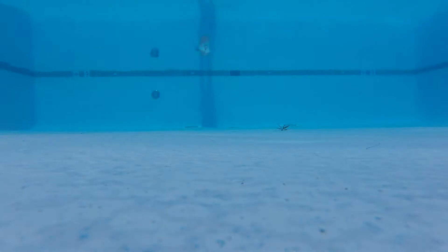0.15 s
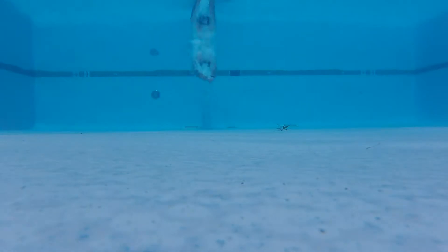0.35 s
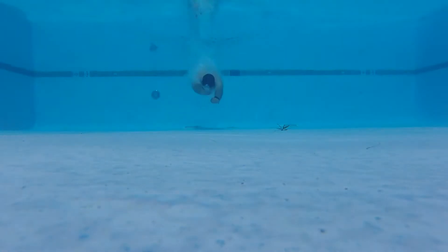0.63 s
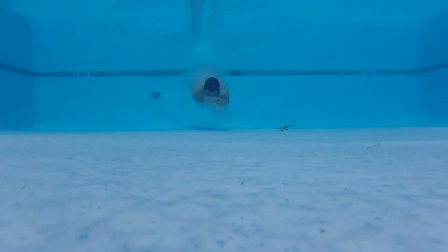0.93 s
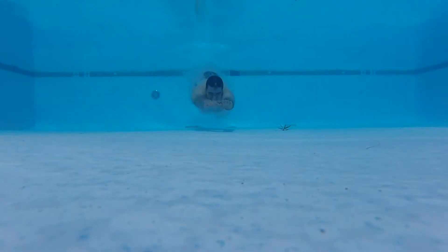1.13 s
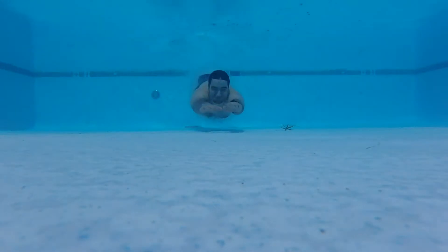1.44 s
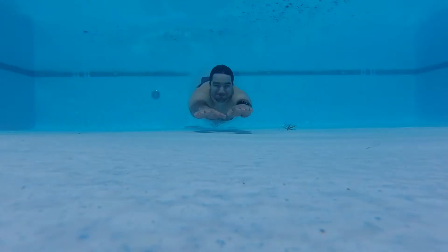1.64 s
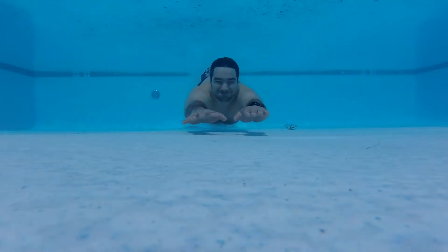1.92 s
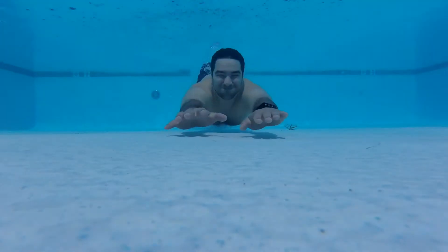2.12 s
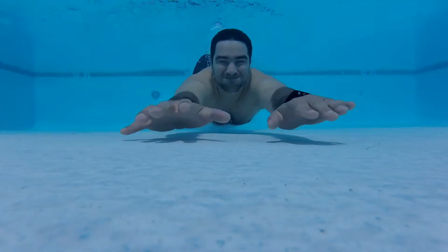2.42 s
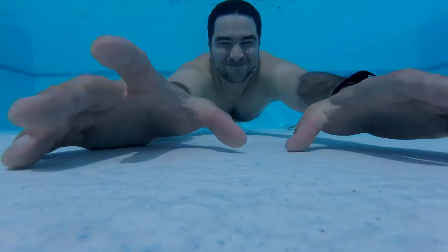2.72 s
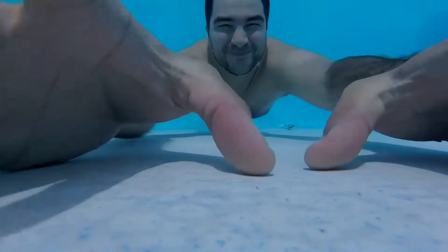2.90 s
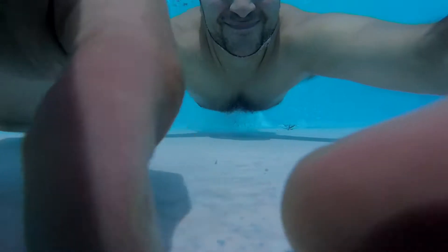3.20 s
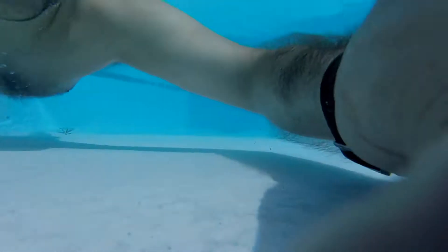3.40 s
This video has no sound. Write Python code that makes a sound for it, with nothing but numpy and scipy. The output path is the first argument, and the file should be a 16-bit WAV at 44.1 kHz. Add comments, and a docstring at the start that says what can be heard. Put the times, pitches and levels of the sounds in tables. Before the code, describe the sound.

Muffled, boxy underwater sound inside a sealed case. Nearly quiet until 0.2 s, when a plunge erupts in dense mid-pitched gurgling, hard bubble plops and deep throbs near 0.35 and 0.75 s, with dry ticks dipping the background. Softer gurgle continues to 1.8 s; plops and low glugs then gather, thickest at 2.8-3.0 s. Wash surges around 3.3 s; hands thud at 3.2 and 3.37 s, scuff, and finally knock at 3.54 s.

```python
"""In a pool, a swimmer dives in and glides up to a sealed case on the bottom; all is heard inside the case.
The plunge tears in air: big pockets throb as decaying sines, clouds of random clicks gurgle through the
case's boxy resonance. Single bubbles plop, chirp and glug as short swelling tones. Shaped noise and clicks
rumble and wash. Hands bump, scuff and knock the case; at some dry ticks the background level drops
abruptly and creeps back."""
import sys
import numpy as np
from scipy import signal
from scipy.fft import rfft, irfft
from scipy.io import wavfile
from scipy.ndimage import uniform_filter1d, minimum_filter1d

SR = 44100
rng = np.random.default_rng(int(sys.argv[2]) if len(sys.argv) > 2 else 0)


def transcribe(signal):
    """Save signal, clipped to [-1, 1], as a 16-bit WAV file at the path in sys.argv[1]."""
    frames = np.atleast_2d(signal).T
    limited = np.clip(frames, -1, 1)
    pcm = np.round(limited * 32767).astype(np.int16)
    wavfile.write(sys.argv[1], SR, pcm)


N = 156555
TIME = np.arange(N) / SR

# boxy resonance of the case: freq_hz, relative_db
CASE_COLOUR = [(200, -48), (310, -39.5), (375, -31), (455, -9), (520, -5.5), (565, -5.5), (650, 2),
               (715, -2), (785, -5.5), (845, -13.5), (915, -8.5), (990, -14), (1100, -28), (1175, -26),
               (1300, -38.5), (3000, -69.5), (6000, -87.5)]
# spectrum of the finest bubbles: freq_hz, relative_db
FIZZ_COLOUR = [(600, -19.5), (1100, 2), (1400, 2.5), (2000, 3.5), (2600, -10), (3500, -21.5), (5000, -33),
               (9000, -45)]
# dry ticks, some with a sudden drop of the background: start_s, peak_db, background_drop_db (nominal)
TICKS = [(.3006, -23, 5.5), (.7167, -22.5, 10.5), (.7486, -46, 0), (.7785, -51, 0), (.9086, -44, 0),
         (3.021, -48, 2), (3.085, -50, 0), (3.1487, -25, 10), (3.3087, -38.5, 0), (3.3406, -43, 0),
         (3.3727, -32.5, 0), (3.3808, -41, 5), (3.5006, -41, 4)]


def from_db(db):
    """Decibels to gain."""
    return 10 ** (np.asarray(db) / 20)


def rms_one(x):
    """Scale to rms 1."""
    return x / np.sqrt(np.mean(x ** 2) + 1e-20)


def level(rows):
    """Gain over time from (time_s, level_db) points."""
    return from_db(np.interp(TIME, *np.transpose(rows)))


def since(start_s):
    """Seconds since an event, zero before it."""
    return np.maximum(TIME - start_s, 0)


def coloured(x, colour):
    """Minimum-phase filter through (freq_hz, db) points, by folding the cepstrum."""
    size = 16384
    freq_hz, db = np.transpose(colour)
    grid_hz = np.maximum(np.fft.rfftfreq(size, 1 / SR), 1)
    magnitude = from_db(np.interp(np.log(grid_hz), np.log(freq_hz), db))
    cepstrum = irfft(np.log(magnitude))
    cepstrum[1:size // 2] *= 2
    cepstrum[size // 2 + 1:] = 0
    impulse_response = irfft(np.exp(rfft(cepstrum)))[:size // 2]
    return signal.fftconvolve(x, impulse_response)[:len(x)]


def steady(x, window_s):
    """Even out slow swings, keep the fine grain; rms 1."""
    window = max(int(window_s * SR), 2)
    power = np.abs(uniform_filter1d(x ** 2, window))
    return rms_one(x / np.sqrt(power + 1e-12))


def noise(colour):
    """Coloured noise with a 1 s run-in discarded; rms 1."""
    return rms_one(coloured(rng.standard_normal(N + SR), colour)[SR:])


def grains(per_s, spread_db):
    """Random clicks of random sign; sizes are exponential in dB, capped at 4 spreads."""
    sizes = from_db(spread_db * np.minimum(rng.exponential(1, N), 4))
    signs = rng.choice([-1, 1], N)
    return sizes * signs * (rng.random(N) < per_s / SR)


def bubble(start_s, peak_db, pitch_hz, swell_s, rise=0.0):
    """A tone that swells and dies; pitch climbs from below to above pitch_hz by up to the share `rise`."""
    age = np.minimum(since(start_s) / swell_s, 20)
    envelope = (age * np.exp(1 - age)) ** 2
    moving_hz = pitch_hz * (1 + rise * np.tanh(age / 2 - 1))
    phase = 2 * np.pi * np.cumsum(moving_hz * (age > 0)) / SR
    return from_db(peak_db) * envelope * np.sin(phase)


def rumble():
    """Water pushed by the swimmer rumbles: steadied low noise."""
    # time_s, level_db
    rumble_levels = [(0, -40), (.15, -49.5), (.32, -26), (.5, -21), (.62, -20.5), (.71, -24.5), (.8, -13),
                     (1.1, -27), (1.6, -35), (1.85, -30), (2.0, -26.5), (2.25, -22.5), (2.45, -40),
                     (2.65, -32), (2.85, -23), (3.1, -31), (3.3, -19), (3.55, -28.5)]
    # freq_hz, relative_db
    rumble_colour = [(10, -15), (24, 3.5), (45, 3), (68, 5.5), (100, -11.5), (170, -24.5), (400, -83.5)]
    return steady(noise(rumble_colour), window_s=0.21) * level(rumble_levels)


def hum():
    """A faint sine of wavering pitch, perhaps the pool's pump."""
    centre_hz, peak_db, wander_rms_share = 54, -43, .05
    slow_colour = [(1, 0), (6, 0), (30, -40), (200, -89.5)]
    wander = rms_one(coloured(rng.standard_normal(N), slow_colour))
    pitch_hz = centre_hz * (1 + wander_rms_share * wander)
    return from_db(peak_db) * np.sin(2 * np.pi * np.cumsum(pitch_hz) / SR)


def hiss():
    """A thin, constant coloured noise."""
    # freq_hz, relative_db
    hiss_colour = [(1000, 0), (3000, -2), (4500, -16.5), (5800, -9), (6200, -4), (6480, 7), (6900, 0),
                   (9000, -5.5), (10500, -13), (12500, -10.5), (14000, -25.5)]
    return from_db(-63.5) * noise(hiss_colour)


def wash():
    """Water breaks into lumpy eddies round the case: sparse low-passed grains."""
    # time_s, level_db
    wash_levels = [(0, -58), (.19, -62), (.3, -45), (.5, -49.5), (.72, -39), (.93, -37.5), (1.35, -35),
                   (1.72, -37.5), (1.96, -24.5), (2.2, -31.5), (2.47, -29), (2.83, -20.5), (3.1, -23.5),
                   (3.3, -9.5), (3.55, -31)]
    # freq_hz, relative_db
    wash_colour = [(40, -19), (85, 1), (130, -0.5), (190, -2), (245, -2.5), (300, -13.5), (345, -7.5),
                   (400, -12.5), (480, -15.5), (700, -30.5), (1500, -77)]
    eddies = coloured(grains(per_s=320, spread_db=2.5), wash_colour)
    return steady(eddies, window_s=0.36) * level(wash_levels)


def tinkle():
    """Small bubbles ring for many cycles, each size a resonator at its own pitch; rms 1."""
    pitches_hz = np.geomspace(1300, 3300, num=28)
    t60_cycles = 210
    clicks = grains(per_s=260, spread_db=3.5)
    dealt = rng.integers(0, len(pitches_hz), N)
    ringing = np.zeros(N)
    for k, hz in enumerate(pitches_hz):
        radius = from_db(-60 * hz / (t60_cycles * SR))
        angle = 2 * np.pi * hz / SR
        feedback = [1, -2 * radius * np.cos(angle), radius * radius]
        own_clicks = clicks * (dealt == k) + 1e-18  # offset avoids denormals
        ringing += signal.lfilter([0, np.sin(angle)], feedback, own_clicks)
    return steady(coloured(ringing, FIZZ_COLOUR), window_s=.25)


def bubble_cloud():
    """Countless small bursts ring the case; the finest add a fizz and a tinkle."""
    # time_s, level_db
    gurgle_levels = [(0, -58), (.15, -57), (.185, -44), (.22, -28), (.29, -20.5), (.4, -14.5), (.55, -15.5),
                     (.69, -15), (.76, -17.5), (.95, -21.5), (1.4, -20), (1.9, -19.5), (2.05, -19),
                     (2.13, -23), (2.4, -24.5), (2.68, -25), (2.9, -19), (2.98, -23.5), (3.06, -18.5),
                     (3.17, -20.5), (3.24, -10.5), (3.33, -16.5), (3.43, -26.5), (3.55, -30)]
    # time_s, level_db (fizz and tinkle together)
    fizz_levels = [(0, -65), (.18, -65.5), (.22, -54), (.27, -50.5), (.29, -38.5), (.315, -48), (.39, -44),
                   (.7, -49.5), (1.2, -54), (2.2, -54.5), (3.1, -60), (3.3, -50), (3.45, -60.5),
                   (3.55, -51)]
    gurgle = steady(coloured(grains(per_s=2000, spread_db=2.5), CASE_COLOUR), window_s=0.086)
    fizz = steady(coloured(grains(per_s=3000, spread_db=1), FIZZ_COLOUR), window_s=0.3)
    fine = from_db(-1.5) * fizz + from_db(-2.5) * tinkle()
    return gurgle * level(gurgle_levels) + fine * level(fizz_levels)


def plops():
    """Single bubbles burst, each with a faint crackle and a short wash of echoes from the pool."""
    # start_s, peak_db, pitch_hz, swell_s
    bursts = [(0.192, -29.5, 623, 0.002), (0.222, -21.0, 481, 0.0074), (0.288, -12, 605, 0.0022),
              (0.332, -5, 618, 0.002), (0.347, -16, 760.0, 0.002), (0.46, -13.5, 680, 0.0038),
              (0.573, -9, 655, 0.0028), (0.634, -1, 685, 0.0024), (0.662, -13, 634, 0.0048),
              (0.695, -8, 702, 0.0025), (0.807, -22, 640, 0.0022), (1.408, -21.5, 673, 0.0089),
              (1.824, -13, 580, 0.0026), (1.931, -6.5, 738, 0.003), (1.941, -13.5, 740, 0.0062),
              (2.009, -14.5, 651, 0.0086), (2.017, -11.5, 643, 0.0014), (2.039, -12.5, 705, 0.0041),
              (2.056, -14.5, 684.5, 0.0089), (2.228, -9.0, 710, 0.0044), (2.308, -23.5, 510, 0.0055),
              (2.444, -14.5, 660, 0.0019), (2.503, -26, 848, 0.0045), (2.556, -14.5, 874, 0.0041),
              (2.581, -11, 705, 0.0023), (2.613, -6.5, 709, 0.0026), (2.618, -32, 1057, 0.008),
              (2.709, -16.5, 567, 0.0037), (2.774, -13, 644, 0.0024), (2.795, -16, 481, 0.0094),
              (2.825, -16.5, 611, 0.0055), (2.906, -11.0, 522, 0.0059), (2.946, -20, 690, 0.003),
              (3.042, -16.5, 695, 0.0078), (3.135, -17.5, 720, 0.0021)]
    # freq_hz, relative_db
    crackle_colour = [(800, -8), (2000, 2), (3000, -5), (5000, -8), (7000, -12), (13000, -23)]
    echo_db, echo_t60_s = -15, 0.14  # level relative to the burst
    crackle_db, crackle_t60_s = -59.5, 0.078

    def tails(t60_s):
        """Summed exponential decays, one from each burst."""
        return sum((TIME > s) * from_db(db - 60 * since(s) / t60_s) for s, db, _, _ in bursts)

    direct = sum(bubble(*row, rise=0.013) for row in bursts)
    white = rng.standard_normal(N)
    echoes = coloured(white * tails(echo_t60_s), CASE_COLOUR) / coloured(white, CASE_COLOUR).std()
    spray = rms_one(coloured(grains(per_s=3300, spread_db=2.5), crackle_colour))
    crackle = from_db(crackle_db) * tails(crackle_t60_s) * spray
    return direct + crackle + from_db(echo_db) * echoes


def ticks():
    """Dry ticks, some with a sudden drop of the background level: filtered impulses."""
    # freq_hz, relative_db
    tick_colour = [(100, 0), (1000, 0), (2000, -2), (4000, -8), (7000, -13), (10000, -21), (13000, -31)]
    clicks = np.zeros(N)
    for start_s, peak_db, _ in TICKS:
        clicks[min(int(start_s * SR), N - 1)] = from_db(peak_db)
    filter_peak = np.abs(coloured(signal.unit_impulse(SR), tick_colour)).max()
    return coloured(clicks, tick_colour) / filter_peak


def level_drops():
    """Background gain: drops abruptly at the ticks that have a drop depth, and creeps back exponentially."""
    fall_s, recovery_s = .002, 1.63  # time constants
    drop_db = 0
    for start_s, _, depth_db in TICKS:
        age_s = since(start_s)
        drop_db = drop_db + depth_db * np.tanh(age_s / fall_s) ** 2 * np.exp(-age_s / recovery_s)
    return from_db(-drop_db)


def air_pockets():
    """Big pockets of air throb: low sines that swell, hold and decay."""
    # start_s, peak_db, pitch_hz, swell_s, hold_s, t60_s
    pockets = [(.355, -14, 47.55, .025, .05, 0.43), (0.637, -32.5, 124.9, 0.024, .09, 0.094),
               (.748, -10.5, 33.27, .018, .07, 0.42), (2.237, -25, 68, .012, .025, .12),
               (3.016, -10, 35.9, .012, .005, 0.18)]
    out = np.zeros(N)
    for start_s, peak_db, pitch_hz, swell_s, hold_s, t60_s in pockets:
        attack = np.sin(np.pi / 2 * np.minimum(since(start_s) / swell_s, 1))
        decay = from_db(peak_db - 60 * since(start_s + swell_s + hold_s) / t60_s)
        out -= attack * decay * np.sin(2 * np.pi * pitch_hz * since(start_s))
    return out


def chirps():
    """Small bubbles ring clearly, rising slightly in pitch."""
    # start_s, peak_db, pitch_hz, swell_s
    small_bubbles = [(1.159, -58.5, 1980, 0.0064), (1.335, -56.5, 2280, 0.0042),
                     (1.616, -53.5, 2210, 0.0037), (1.739, -50.5, 1680, .005), (2.053, -50, 2006, .006),
                     (2.165, -54, 1704, 0.0049), (2.233, -49, 2015, 0.0047), (2.301, -49.5, 1630, 0.0068),
                     (2.44, -52.5, 1630, 0.0047), (2.61, -55, 2240, 0.0043), (2.825, -36, 1158, .01)]
    return sum(bubble(*row, rise=0.013) for row in small_bubbles)


def glugs():
    """Large bubbles close by glug upward in pitch."""
    # start_s, peak_db, pitch_hz, swell_s
    large_bubbles = [(1.952, -18.0, 122.0, 0.0084), (1.976, -21, 100.0, 0.01), (2.032, -23, 157.0, 0.005),
                     (2.149, -17, 134.0, 0.0075), (2.195, -18, 107.0, 0.0067), (2.566, -24, 102.0, 0.0066),
                     (2.785, -12.5, 187.0, 0.01), (2.814, -12.5, 150.0, 0.0062),
                     (2.859, -15.0, 179.0, 0.0078), (2.867, -18.5, 363, 0.0037),
                     (2.899, -18.5, 133, 0.0046), (2.94, -12.5, 187.0, 0.0091),
                     (2.993, -10.5, 210.0, 0.0066), (3.007, -16, 215.0, 0.01)]
    return sum(bubble(*row, rise=0.037) for row in large_bubbles)


def scuffs():
    """Skin slips briefly on the case: noise under a swelling and dying pressure."""
    # start_s, peak_db (of the rms), swell_s
    slips = [(3.139, -54, .0015), (3.361, -60.5, .002), (3.377, -50.5, .002), (3.388, -71, .005),
             (3.403, -57.5, .002)]
    # freq_hz, relative_db
    scuff_colour = [(500, -8), (1500, 2.5), (3000, -12.5), (5000, -20.5), (7000, -13), (10000, -21),
                    (13000, -25)]
    pressure = np.zeros(N)
    for start_s, peak_db, swell_s in slips:
        age = since(start_s) / swell_s
        pressure += from_db(peak_db) * age * np.exp(1 - age)
    return pressure * noise(scuff_colour)


def bumps():
    """Hands bump the case: decaying sines softened by a low-pass."""
    # start_s, level_db (initial, ahead of the low-pass), pitch_hz, t60_s
    hits = [(3.1853, -6, 65, 0.057), (3.1847, -4.5, 174, 0.025), (3.363, -9, 247.6, 0.11),
            (3.3637, -19, 373, .06), (3.373, -0.5, 80, 0.036), (3.378, -1.5, 171, 0.02)]
    thuds = np.zeros(N)
    for start_s, level_db, pitch_hz, t60_s in hits:
        age_s = since(start_s)
        thuds += from_db(level_db - 60 * age_s / t60_s) * np.sin(2 * np.pi * pitch_hz * age_s)
    soft = signal.butter(2, 420, fs=SR, output="sos")
    return -signal.sosfilt(soft, thuds + 1e-18)  # offset avoids denormals


def knock():
    """A fingertip knocks on the case: one short swelling tone."""
    return bubble(start_s=3.5362, peak_db=-27, pitch_hz=850, swell_s=.0022)


def scene():
    """Water, bubbles, hum and hiss drop at some ticks; near events keep their level."""
    background = rumble() + hum() + hiss() + wash() + bubble_cloud()
    near = plops() + ticks() + air_pockets() + chirps() + glugs() + scuffs() + bumps() + knock()
    return (background * level_drops() + near)[None]


def record(dry):
    """A look-ahead limiter holds the peaks down, then a steep low-pass cuts the top."""
    peak_limit, cutoff_hz = .56, 14000
    span = int(.006 * SR)
    needed_gain = np.minimum(1, peak_limit / (np.abs(dry) + 1e-9))
    gain = uniform_filter1d(minimum_filter1d(needed_gain, span), span)
    low_pass = signal.cheby2(12, 70, cutoff_hz, fs=SR, output="sos")
    return signal.sosfilt(low_pass, dry * gain)


dry = scene()
out = record(dry)
transcribe(out)
```